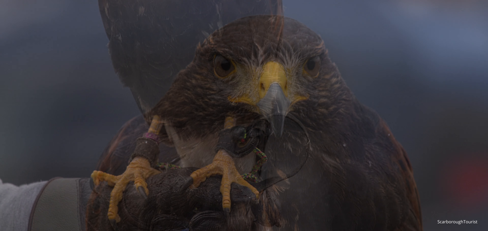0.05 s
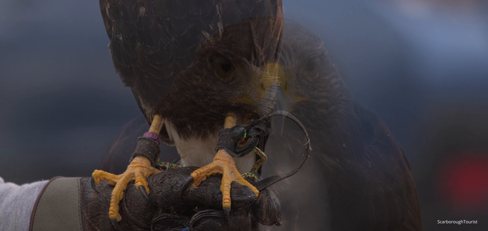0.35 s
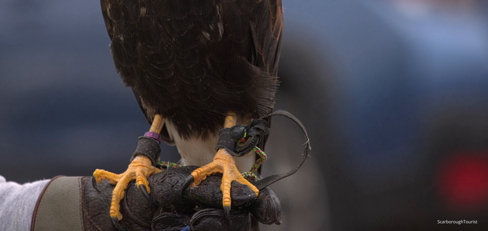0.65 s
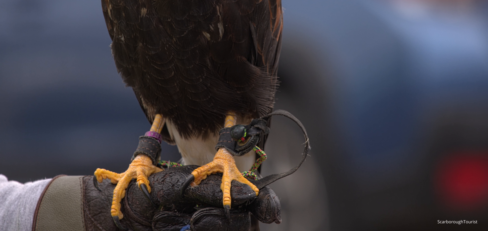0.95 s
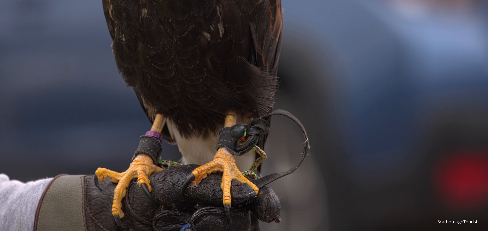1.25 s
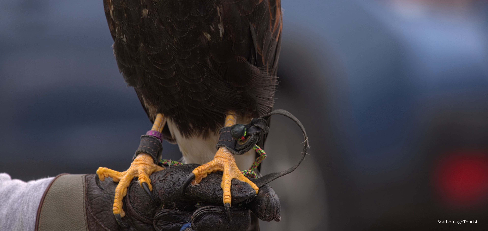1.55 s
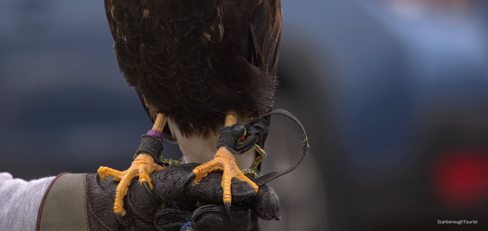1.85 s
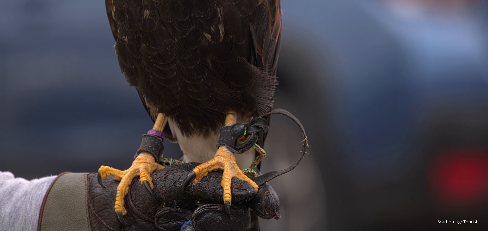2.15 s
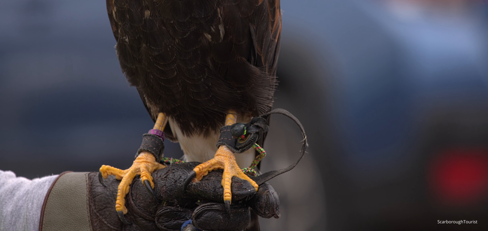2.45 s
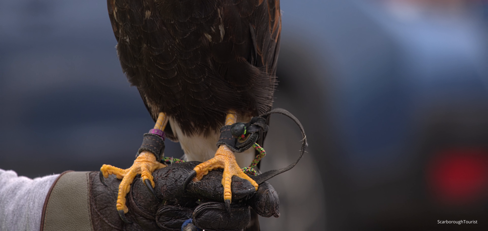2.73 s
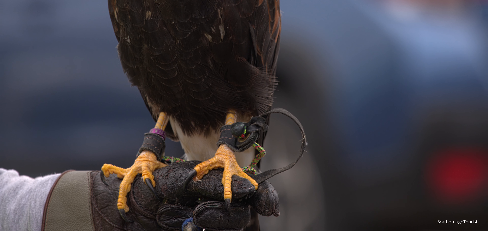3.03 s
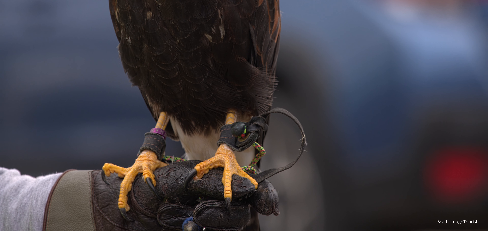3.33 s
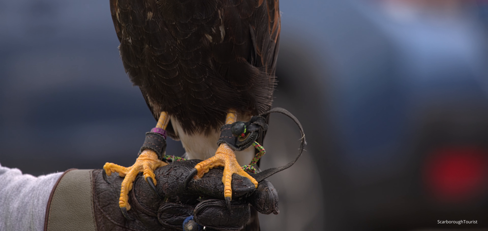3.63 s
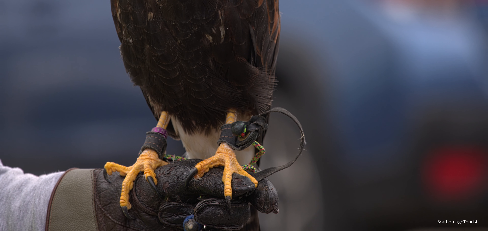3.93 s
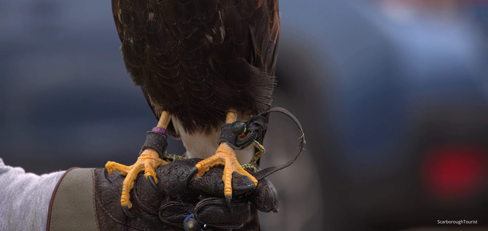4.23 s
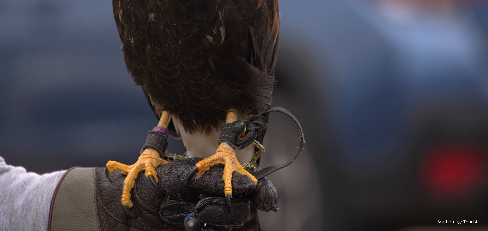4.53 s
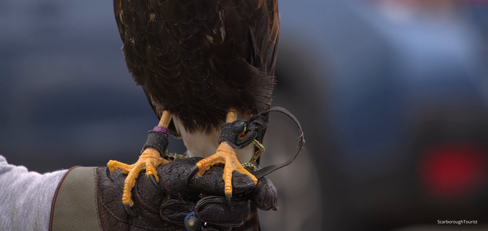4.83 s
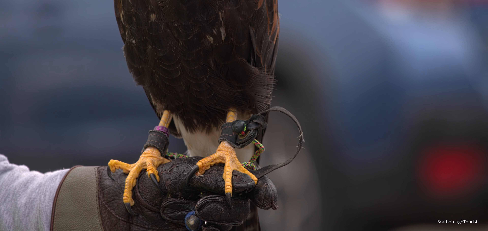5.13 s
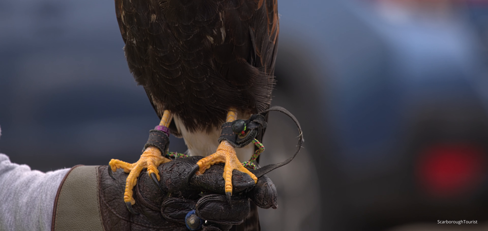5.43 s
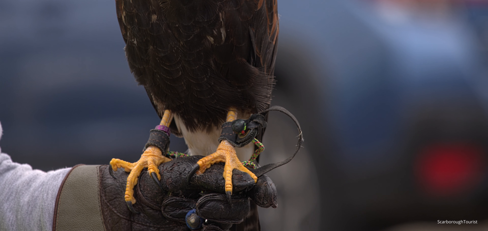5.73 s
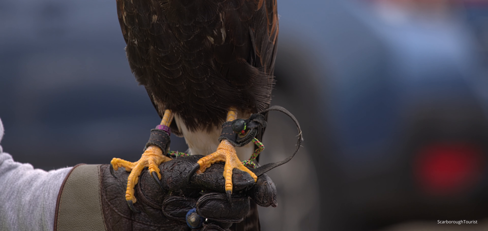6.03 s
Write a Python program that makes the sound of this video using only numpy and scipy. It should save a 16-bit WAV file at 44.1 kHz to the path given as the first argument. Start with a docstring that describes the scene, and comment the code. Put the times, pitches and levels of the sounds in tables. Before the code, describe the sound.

Outdoors in soft rushing wind, a hawk gives a thin falling whistle that frays and fades. After a pause with a few faint dull bumps, it lets out a long, harsh rasping scream that grows rougher and weaker as it ends. A brief dry rustle, small clicks and faint leaves follow. The hawk is close, dry and centred, while a songbird is barely heard far away.

```python
"""A hawk screams in the wind

A hawk calls twice: first a thin falling whistle that frays and fades, then a close, long rasp.
The rasp is membranes slapping in its voice box and ringing in its throat; as the air runs out,
the pulses turn uneven and halve in rate. Soft wind (shaped noise) rushes all around, with
a faint far songbird, a few dull bumps, small clicks and a brief rustle."""
import sys
import numpy as np
from scipy import signal
from scipy.fft import rfft, irfft, next_fast_len
from scipy.io import wavfile
from scipy.ndimage import uniform_filter1d, map_coordinates

SR = 44100
rng = np.random.default_rng(int(sys.argv[2]) if len(sys.argv) > 2 else 0)


def generate_wav(sig):
    """Save sig (samples, or channels by samples) to the path in sys.argv[1] as 16-bit PCM at SR."""
    pcm = np.round(np.clip(np.atleast_2d(sig).T, -1, 1) * 32767).astype(np.int16)
    wavfile.write(sys.argv[1], SR, pcm)


N = 276930
TIME = np.arange(N) / SR
RASP_START_S, RASP_END_S = 2.513, 4.168


def amp(db):
    """Turn decibels into a gain to multiply by."""
    return 10 ** (np.asarray(db) / 20)


def unit(x):
    """Scale a signal to an average power of 1."""
    return x / np.sqrt(np.mean(np.abs(x) ** 2) + 1e-20)


def ramp(start, length):
    """Rise from 0 at start to 1 over length seconds."""
    return np.clip((TIME - start) / length, 0, 1)


def hump(peak_s, half_length_s):
    """Swell smoothly to 1 and die away again."""
    return np.exp(-((TIME - peak_s) / half_length_s) ** 2)


def along(points, hz):
    """Read between (frequency, value) points on a logarithmic frequency scale."""
    f, values = np.transpose(points)
    return np.interp(np.log(hz + 1), np.log(f + 1), values)


def curve(points):
    """Join (time, value) points with straight lines."""
    return np.interp(TIME, *np.transpose(points))


def wobble(rate):
    """A smooth curve through rate random values a second."""
    return map_coordinates(rng.standard_normal(int(N * rate / SR) + 4), [np.arange(N) * rate / SR])


def filtered(x, response):
    """Scale and delay each frequency in x as the function response says."""
    size = next_fast_len(N + 8192)
    return irfft(rfft(x, size) * response(np.fft.rfftfreq(size, 1 / SR)), size)[..., :N]


def resonate(x, shape, size=2048):
    """Let x ring in a hollow space whose spectrum is shape."""
    cepstrum = irfft(np.log(amp(along(shape, np.fft.rfftfreq(size, 1 / SR)))))
    # fold onto the first half, so the ringing never comes before its cause
    cepstrum[1:size // 2] *= 2
    cepstrum[size // 2 + 1:] = 0
    ring = irfft(np.exp(rfft(cepstrum)))
    return signal.oaconvolve(x, ring / np.linalg.norm(ring))[:N]


def wandering(x, shape, stretch):
    """Let x ring while all the ringing frequencies move by the factor stretch."""
    clock, samples = np.cumsum(stretch), np.arange(N)
    warped = map_coordinates(x, [np.interp(samples, clock, samples)])
    return map_coordinates(resonate(warped, shape), [clock])


def tone(hz):
    """A pure tone that follows a pitch curve."""
    return np.sqrt(2) * np.sin(2 * np.pi * np.cumsum(hz) / SR)


def frayed(hz, half_width_hz):
    """A rough tone: its strength and phase tumble at random, smearing its pitch."""
    knots = np.arange(1, N + 1) * 2 * half_width_hz / SR
    real, imaginary = (map_coordinates(row, [knots]) for row in rng.standard_normal((2, SR // 8)))
    phase = 2 * np.pi * np.cumsum(hz) / SR
    return unit(real * np.cos(phase) + imaginary * np.sin(phase))


def whistle():
    """Two clear falling tones break off; rough strands swell, sag and drop out; a peep ends the call."""
    # main and lower tone: f/Hz, fall/(Hz/s), level/dB, fade/(dB/s), end/s
    clear_tones = [(2129, 850, -23.5, 62, 0.15), (1592, 380, -36, 15, 0.07)]
    # strands the whistle frays into: f/Hz, fall/(Hz/s), half width/Hz, level/dB, start/s, end/s
    rough_strands = [(1580, 130, 36, -42, 0.046, 0.2), (1487, 170, 35, -48, .13, 0.194),
                     (2020, 230, 70, -40.5, 0.0766, 0.473), (2234, 250, 155, -37, 0.0264, 0.49),
                     (2325, 110, 80, -39.5, 0.0342, 0.624), (2510, 39.5, 70, -45.5, 0.014, 0.34),
                     (2460, 930, 50, -45, .32, 0.51), (2075, 2500, 69, -33.5, .51, 0.543)]
    switch_s, strand_break_s = 0.039, 0.086
    (pitch, main_gain), (low_pitch, low_gain) = [
        (hz - fall * TIME, amp(db - fade * TIME) * (1 - ramp(end, switch_s)))
        for hz, fall, db, fade, end in clear_tones]
    main = main_gain * amp(0.77 * wobble(100)) * tone(pitch * (1 + 0.012 * wobble(210)))
    lower = low_gain * amp(1.3 * wobble(90)) * tone(low_pitch * (1 + 0.0085 * wobble(150)))
    upper = main_gain * amp(-21.5) * frayed(pitch + 492, half_width_hz=78)
    strands = np.zeros(N)
    for hz, fall, width, db, start, end in rough_strands:
        gain = amp(db) * ramp(start, switch_s) * (1 - ramp(end, strand_break_s))
        strands += gain * frayed(hz - fall * (TIME - start), width)
    fray_db = 8.5 * (ramp(0, 0.18) ** 2 - 1) - 19.5 * np.maximum(TIME - 0.235, 0)  # swell, hold, fade
    peep_s = 0.741
    peep_hz = (2280 - 900 * (TIME - peep_s)) * (1 + .012 * wobble(249))
    peep = amp(-50) * hump(peep_s, .018) * tone(peep_hz)
    onset = np.sin(np.pi / 2 * ramp(0, .004)) ** 2
    return onset * (main + lower + upper + amp(fray_db + 0.66 * wobble(45)) * strands + peep)


def air_noise(spectrum, alike, lag_s, patchy_db):
    """Patchy stereo noise; the share alike reaches both ears, the left one lag_s sooner."""
    cells = signal.stft(rng.standard_normal((3, N)), nperseg=512)[2]  # noise by frequency and time
    patches = uniform_filter1d(rng.standard_normal(cells.shape[1:]), size=5, axis=0)
    patches = uniform_filter1d(patches, size=10, axis=1)
    noise = signal.istft(cells * amp(patchy_db * unit(patches)), nperseg=512)[1][:, :N]
    shared = filtered(noise[2], lambda hz: np.exp(1j * np.pi * lag_s * np.outer([1, -1], hz)))
    stereo = np.sqrt(alike) * shared + np.sqrt(1 - alike) * noise[:2]
    return unit(filtered(stereo, lambda hz: amp(along(spectrum, hz))))


def wind():
    """One strength drives a low body, a mid rush and a fine hiss: stronger wind is brighter."""
    # wind strength compared with calm air: t/s, level/dB
    strength = [(0, 10), (.4, 4.5), (.85, 4), (1.1, 6), (1.45, 0.3), (2.2, -1), (2.45, 3), (2.7, -10),
                (3.15, -5.5), (3.5, 10), (4.0, 9), (4.4, 5.5), (4.85, 7), (5.05, 2), (5.35, -2), (6.28, -1)]
    # tone colours of the three layers: f/Hz, level/dB
    body_shape = [(25, -42), (70, -43), (120, -27), (170, -20.5), (240, -9), (350, -3), (550, 0.5),
                  (800, 0), (1100, -3), (1600, -8), (3000, -48)]
    rush_shape = [(500, -28), (1000, 3.5), (1500, 2.5), (2300, 1.5), (3100, -4.5), (4200, -7.5),
                  (6000, -19.5), (9000, -55), (16000, -44)]
    hiss_shape = [(3000, -28), (5000, -7.5), (7000, 3), (9500, -2), (12500, 2.5), (15500, 0)]
    strength_db, gust = curve(strength), wobble(10)
    body_db = -49.5 + 0.44 * strength_db + 0.2 * gust + 1.55 * wobble(40)
    rush_db = -56 + strength_db + 0.14 * gust
    hiss_db = -72.5 + 1.47 * strength_db
    body = amp(body_db) * air_noise(body_shape, alike=0.95, lag_s=0.00037, patchy_db=0.45)
    rush = amp(rush_db) * air_noise(rush_shape, alike=0.29, lag_s=0.00037, patchy_db=2.0)
    hiss = amp(hiss_db) * air_noise(hiss_shape, alike=0.23, lag_s=0.000177, patchy_db=1.7)
    return body + rush + hiss * amp([[1.6], [-1.6]])  # the hiss leans left


def leaves():
    """Leaves rustle, barely there at first and louder near the end."""
    # loudness of the leaves: t/s, level/dB
    leaf_levels = [(0, -77.5), (3.8, -92), (4.5, -65), (5.3, -59), (6.28, -60.5)]
    # their tone colour: f/Hz, level/dB
    leaf_shape = [(900, -31), (1500, -18), (1900, -3), (2400, -4), (2900, -7.5), (3600, -14), (5000, -20),
                  (7000, -22.5), (12000, -29)]
    return amp(curve(leaf_levels)) * air_noise(leaf_shape, alike=0.25, lag_s=0.00044, patchy_db=-0.5)


def slurred_notes():
    """Faint wavering notes, mostly a far songbird's, each gliding through three pitches."""
    # notes: t/s, length/s, level/dB, first f/Hz, middle f/Hz, last f/Hz
    song = [(0.247, 0.022, -40, 4740, 4780, 4310), (0.486, 0.14, -67, 3850, 3930, 4280),
            (0.707, 0.098, -65, 4150, 4270, 4130), (0.975, 0.08, -63, 4480, 4130, 3900),
            (1.225, 0.09, -67, 3950, 4230, 4030), (1.317, 0.12, -71, 3980, 3890, 3880),
            (2.445, 0.071, -44.5, 335, 470, 598), (4.872, 0.058, -63, 4200, 4000, 3800),
            (5.078, .095, -67.5, 3800, 3850, 3500), (5.179, 0.058, -69, 3600, 4520, 5250),
            (5.237, 0.05, -70, 4500, 3550, 3150), (5.468, 0.05, -70, 5000, 4900, 4570)]
    out = np.zeros(N + SR)
    for start, length, db, *path_hz in song:
        progress = np.linspace(0, 1, round(length * SR))
        arch = np.polyval(np.polyfit([0, .5, 1], path_hz, 2), progress)
        pitch = arch * (1 + .017 * wobble(260)[:len(arch)])
        swell = np.sqrt(np.abs(np.sin(np.pi * progress)))
        out[round(start * SR):][:len(arch)] += amp(db) * swell * tone(pitch)
    return out[:N]


def nearby_echo(x, t60):
    """Things nearby scatter sound back, differently to each ear; it drops 60 dB in t60 seconds."""
    t = np.arange(SR // 2) / SR
    tail = rng.standard_normal((2, len(t))) * amp(-60 * t / t60)
    return signal.fftconvolve(x[None], tail / np.linalg.norm(tail[0]), axes=1)[:, :N]


def bumps():
    """Dull bumps: brief swells of low noise around one pitch, each from its own side."""
    # the clearest bumps: t/s, level/dB, f/Hz, half width/Hz, length/s, side (-1 right to 1 left)
    clear_bumps = [(0.982, -51, 287, 40, 0.051, -0.38), (1.076, -57.5, 222, 60, 0.044, -0.34),
                   (1.071, -47.5, 1390, 300, 0.015, -0.24), (1.111, -45, 830, 420, 0.053, -0.81),
                   (1.189, -39.5, 560, 300, 0.02, -0.25), (1.221, -44.5, 700, 350, .016, -0.29),
                   (1.821, -52, 430, 200, .012, -.5), (2.372, -51, 666, 300, 0.018, -.5),
                   (3.341, -39.5, 406, 184, 0.019, -0.012), (3.478, -44, 385, 123, 0.088, -0.11),
                   (3.595, -45, 332, 191, 0.14, -0.087), (3.599, -51, 192, 50, .03, -.1),
                   (3.786, -38.5, 388, 52.4, 0.024, 0.22), (4.872, -48.5, 435, 110, .02, -.4),
                   (4.914, -44.5, 725, 300, 0.0083, -.2), (4.934, -47, 654, 230, 0.0099, -.2),
                   (5.023, -52, 1450, 150, 0.018, .3), (5.204, -50.5, 422, 99, 0.01, -.6),
                   (5.474, -47, 520, 260, .008, -.5), (5.487, -43, 540, 300, 0.0086, -0.45),
                   (5.551, -49.5, 436, 119, 0.013, .5), (5.735, -51.5, 430, 140, .01, -0.68),
                   (5.934, -53.5, 2390, 700, 0.026, 0.98), (6.225, -55, 180, 110, 0.0048, -0.92)]
    # tone colour they all share, with little deep bass: f/Hz, level/dB
    bump_shape = [(60, -40), (130, -32), (190, 3.5), (260, 10), (4000, 14.5)]
    # fainter ones come at random from the right
    faint_bumps = [(.5 + when * (N / SR - .5), -59.5 + 6 * force, 350 * 2 ** (pitch - .5), 130, .022, -.9)
                   for when, force, pitch in rng.random((16, 3))]
    t, out = np.arange(SR // 4) / SR - 1 / 8, np.zeros((2, N + SR))
    hz = np.fft.rfftfreq(len(t), 1 / SR)
    ears = np.array([[1], [-1]])
    side_db, side_lag_s = 4, 0.0004  # the nearer ear hears it louder and sooner
    for peak_s, db, centre, width, length, side in clear_bumps + faint_bumps:
        band = amp(along(bump_shape, hz)) / (1 + ((hz - centre) / width) ** 4)
        swell = np.exp(-2 * (t / length) ** 2)
        bump = swell * irfft(rfft(rng.standard_normal(len(t))) * band, len(t))
        bump *= amp(db) * np.linalg.norm(swell) / np.linalg.norm(bump)
        placing = amp(side_db * side * ears) * np.exp(1j * np.pi * side_lag_s * side * ears * hz)
        out[:, round((peak_s + t[0]) * SR):][:, :len(t)] += irfft(rfft(bump) * placing, len(t))
    return out[:, :N]


def clicks():
    """Small dry clicks without bass: a sharp contact, then a scrape that dies within milliseconds."""
    # clicks: t/s, level/dB, lowest f/Hz, highest f/Hz, time to drop 60 dB/s
    contacts = [(1.506, -37, 500, 990, 0.012), (4.424, -42.5, 8300, 15500, 0.0075),
                (4.4242, -38.5, 1890, 3030, .011), (4.427, -55, 8000, 16000, .012),
                (4.9228, -21, 460, 1430, 0.0014), (5.487, -51, 1200, 4500, .02),
                (6.152, -44, 500, 1400, 0.0068)]
    t, out = np.arange(SR // 20) / SR, np.zeros(N + SR)
    for start, db, low_hz, high_hz, t60 in contacts:
        band = signal.butter(3, [low_hz, high_hz], "bandpass", fs=SR)
        decay = amp(-60 * t / t60)
        snap = 1.5 * np.linalg.norm(decay) * (t == 0)
        click = signal.lfilter(*band, snap + decay * rng.standard_normal(len(t)))
        out[round(start * SR):][:len(t)] += amp(db) * click * np.linalg.norm(decay) / np.linalg.norm(click)
    return out[:N]


def levelled(x):
    """Even out slow changes in loudness."""
    return x / np.sqrt(np.abs(uniform_filter1d(x * x, size=2400)) + 1e-9)


def voice_box(rough, doubling_db):
    """Membranes slap unevenly, each slap followed by a short puff of swirling air."""
    # the slap rate rises, drops into a piercing note, jumps back and sinks: t/s, f/Hz
    slap_rates = [(2.5, 450), (2.54, 460), (2.57, 477), (2.603, 486), (2.612, 424), (2.64, 407),
                  (2.664, 397), (2.672, 438), (2.705, 429), (2.745, 412), (2.80, 398), (2.88, 372),
                  (3.13, 358), (3.24, 416), (3.7, 426), (3.88, 350), (4.25, 330)]
    rate = curve(slap_rates)
    cycles = np.cumsum(rate * np.exp(.13 * rough ** 2 * wobble(130))) / SR
    due = np.interp(np.arange(1, int(cycles[-1])), cycles, np.arange(N))  # one slap a cycle, in samples
    here = due.astype(int)
    timing, force = rng.standard_normal((len(due), 2)).T
    late_cycles = .21 * rough[here] ** 2 * timing
    at = np.clip(due + late_cycles * SR / rate[here], 8, N - 10)
    scatter_db = 1.8 * rough[here] * np.minimum(force, 1)  # slaps can fail further than they overshoot
    every_second = np.arange(len(at)) % 2  # weakening these halves the rate one hears
    strength = amp(scatter_db - doubling_db[here] * every_second)
    # a smooth spike lets each slap fall between two samples
    taps = at.astype(int)[:, None] + np.arange(-7, 9)
    offset = taps - at[:, None]
    spikes = strength[:, None] * np.sinc(offset) * np.sinc(offset / 8)
    slaps = np.bincount(taps.ravel(), spikes.ravel(), N)
    puff_t60, air_share = .0095, np.clip(.61 * rough, 0, 1)
    puffs = signal.lfilter([1], [1, -amp(-60 / (puff_t60 * SR))], slaps) * rng.standard_normal(N)
    return np.sqrt(1 - air_share) * levelled(slaps) + np.sqrt(air_share) * levelled(puffs)


def throat(pulses, spent, gape, piercing):
    """The pulses ring in the throat, which quivers and grows quieter as the breath is spent."""
    # throat ringing with the beak open, closed, and in the piercing note: f/Hz, level/dB
    open_shape = [(150, -37.5), (400, -32.5), (650, -8.5), (830, -7.5), (1120, -2.5), (1200, -2),
                  (1310, 3.5), (1440, -1), (1540, -2.5), (1700, 2), (1850, 7), (1970, 3.5), (2130, -4.5),
                  (2700, -17.5), (3300, -14), (4500, -83)]
    closed_shape = [(150, -54.5), (400, -11), (700, -2.5), (1200, -6.5), (1370, 2.5), (1520, -7),
                    (1780, 1.5), (2030, 0), (2170, -6), (2450, -28), (2700, -19), (3300, -27), (4500, -69)]
    piercing_shape = [(150, -45), (600, -12), (830, -8.5), (1230, 0), (1650, 7.5), (2030, 7.5), (2200, -18),
                      (2600, -2.5), (3300, -21), (4500, -85)]
    quiver = np.exp(.014 * np.sqrt(spent) * wobble(30))
    ring = gape * wandering(pulses, open_shape, quiver)
    ring += (1 - gape) * wandering(pulses, closed_shape, quiver)
    ring = (1 - piercing) * ring + piercing * resonate(pulses, piercing_shape)
    return amp(-28 - 14 * spent ** 1.36) * ring


def bright_edge(pulses, spent, gape, piercing):
    """The rasp's high ringing builds up just after the throat's; the closing beak dulls it."""
    # high ringing with the beak open, closed, and in the piercing note: f/Hz, level/dB
    open_shape = [(2400, -40), (2900, -22), (3280, -27), (3520, -1.5), (3680, -0.5), (3870, 5), (4280, -5),
                  (4550, -3.5), (4800, -2), (5100, -3.5), (5400, 0), (6050, 0.3), (6550, -10.5),
                  (7300, -14.5), (7900, -5.5), (9000, -14), (9400, -17.5), (9850, -26), (10300, -18.5),
                  (10850, -19.5), (11250, -39), (15000, -44)]
    closed_shape = [(2400, -45), (2850, -12), (3200, -26), (3550, -2), (3860, 4.5), (4230, -4), (4500, -3),
                    (4850, -10.5), (5300, -0.5), (5650, 1), (5950, -1), (6350, -10), (6750, -15),
                    (7350, -19), (7850, -17), (8200, -27.5), (14000, -38)]
    piercing_shape = [(2400, -31), (3000, -8), (3700, -1), (4500, -2), (5300, 4), (5900, 0), (6600, -21),
                      (8100, -7.5), (9500, -20), (10600, -26), (13000, -34), (15000, -42)]
    ring = gape * resonate(pulses, open_shape) + (1 - gape) * resonate(pulses, closed_shape)
    ring = (1 - piercing) * ring + piercing * resonate(pulses, piercing_shape)
    return amp(-32 - 16.5 * spent - 0.5 * piercing) * np.sqrt(ramp(RASP_START_S, 0.045)) * ring


def sizzle(pulses, spent):
    """The rasp's highest band needs full pressure and dies first."""
    # its tone colour: f/Hz, level/dB
    sizzle_shape = [(10900, -45), (11700, -4), (12100, -6), (12500, -2), (13000, -4), (13600, -14),
                    (15500, -29)]
    elapsed_s = spent * (RASP_END_S - RASP_START_S)
    return amp(-63.5 - 19 * elapsed_s) * resonate(pulses, sizzle_shape)


def rasp():
    """One long breath: as it runs out, the pulses weaken, roughen and halve in rate."""
    # extra pushes of air: t/s, half length/s, level/dB
    pushes = [(2.506, 0.01, 7), (3.218, 0.022, 1.3), (3.311, 0.039, 2.5)]
    # membranes lock into a clearer note: t/s, length/s, roughness left/0-1, level/dB, piercing share/0-1
    locks = [(2.535, .065, .8, 0, 0), (2.61, .053, .24, -.2, .9), (2.672, .075, .44, .4, 0),
             (2.755, .1, .76, 0, 0)]
    # the beak closes: t/s, opening/0-1
    beak_opening = [(2.5, 1), (3.0, 0.85), (3.37, 0.75), (3.43, 0.22), (4.2, 0)]
    spent = ramp(RASP_START_S, RASP_END_S - RASP_START_S)  # share of the breath used up
    rough = .46 + .37 * ramp(RASP_START_S, .5)
    doubling_db = 8.8 * ramp(2.95, .5) - 3.5 * spent ** 4  # every second slap weakens, then partly returns
    effort_db, piercing = -0.07 * wobble(26), np.zeros(N)
    for peak_s, half_length, db in pushes:
        effort_db += db * hump(peak_s, half_length)
    for start, length, rough_left, db, share in locks:
        locked = ramp(start, .008) - ramp(start + length, .008)
        rough *= rough_left ** locked
        effort_db += db * locked
        piercing += share * locked
    breath = amp(effort_db) * ramp(RASP_START_S, 0.03) * (1 - ramp(RASP_END_S, 0.055))
    pulses = breath * voice_box(rough, doubling_db)
    gape = curve(beak_opening)
    return (throat(pulses, spent, gape, piercing) + bright_edge(pulses, spent, gape, piercing)
            + sizzle(pulses, spent))


def rustle():
    """A brief dry rustle swells and dies, perhaps a glove shifting."""
    # its tone colour: f/Hz, level/dB
    rustle_shape = [(300, -45), (1200, -14), (2500, -8), (3800, 5), (4700, 0), (6000, -1), (9000, -12),
                    (15000, -17)]
    flutter = unit(amp(2 * wobble(180)))
    noise = air_noise(rustle_shape, alike=.4, lag_s=.0003, patchy_db=-3.0)
    return amp(-57) * hump(4.85, 0.1) * flutter * noise


def scene():
    """The hawk is close, dry and central; the small sounds lie further off in the wind."""
    small = bumps() + clicks() + slurred_notes()
    hawk = whistle() + rasp()
    echo = amp(-6.5) * nearby_echo(small.mean(axis=0), t60=0.15)
    return hawk + small + echo + rustle() + wind() + leaves()


def record(dry):
    """Cut off the very highest treble."""
    return filtered(dry, lambda hz: hz < 15750)


dry = scene()
out = record(dry)
generate_wav(out)
```